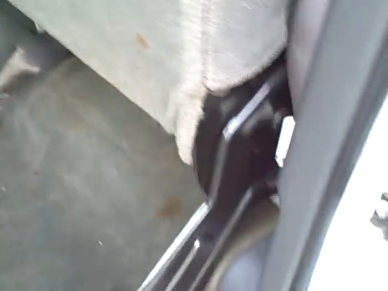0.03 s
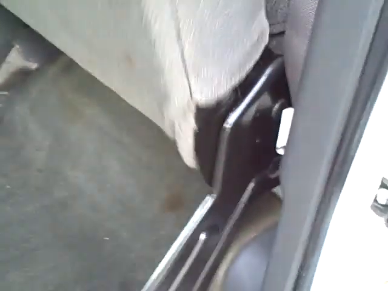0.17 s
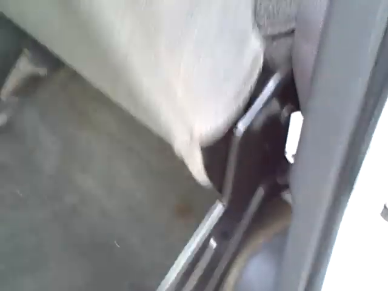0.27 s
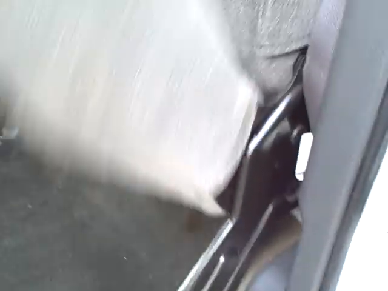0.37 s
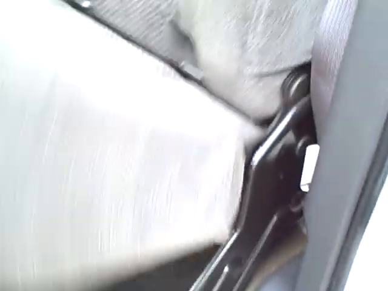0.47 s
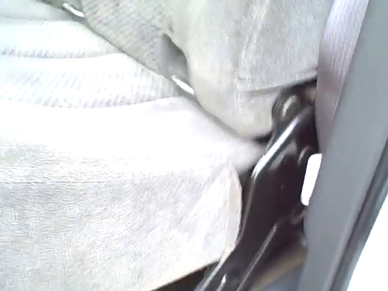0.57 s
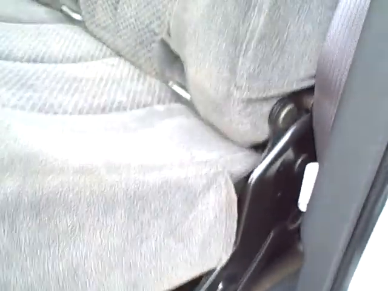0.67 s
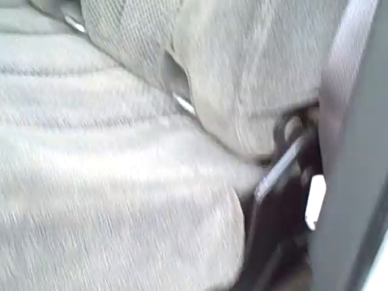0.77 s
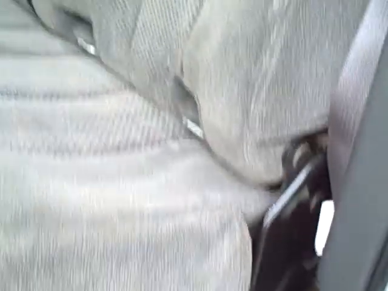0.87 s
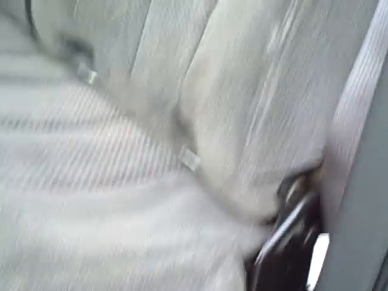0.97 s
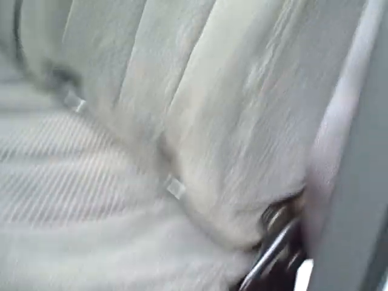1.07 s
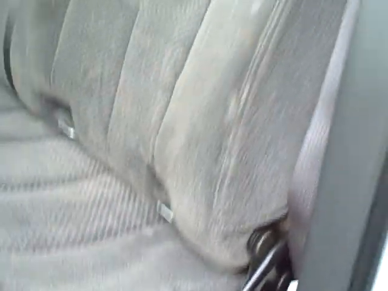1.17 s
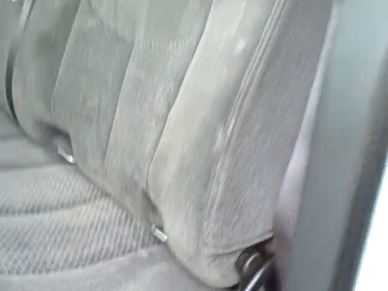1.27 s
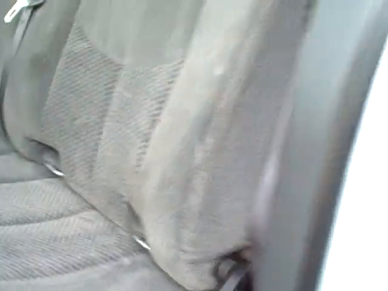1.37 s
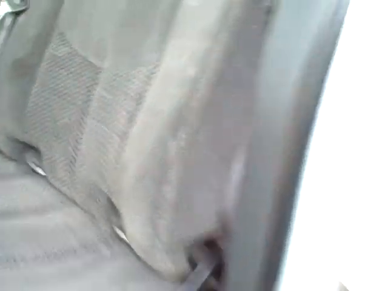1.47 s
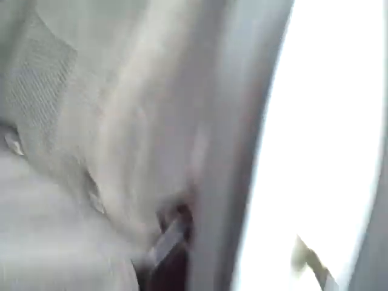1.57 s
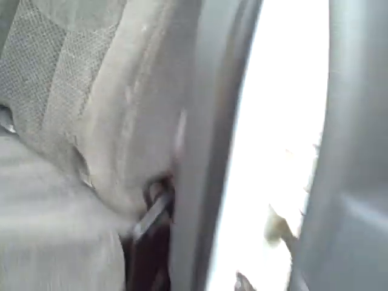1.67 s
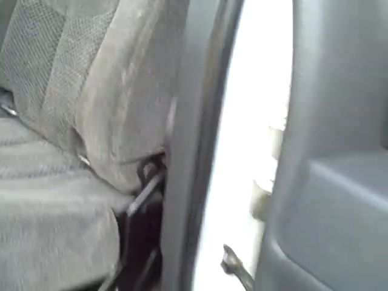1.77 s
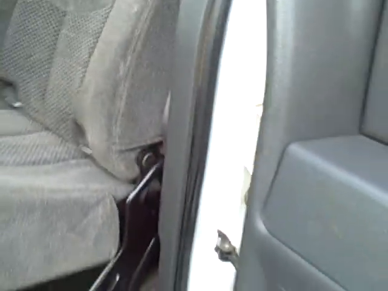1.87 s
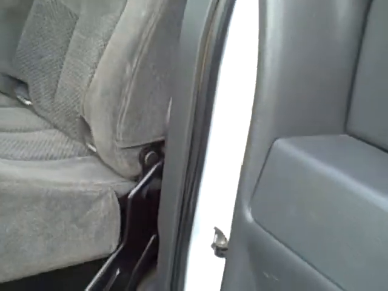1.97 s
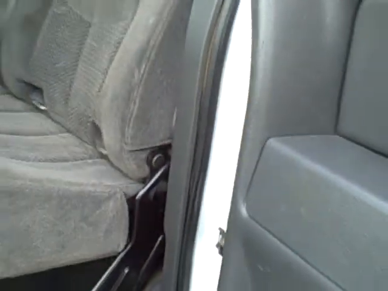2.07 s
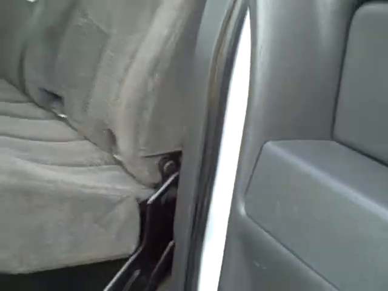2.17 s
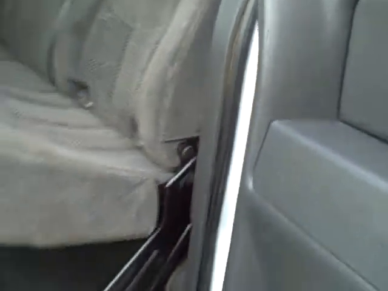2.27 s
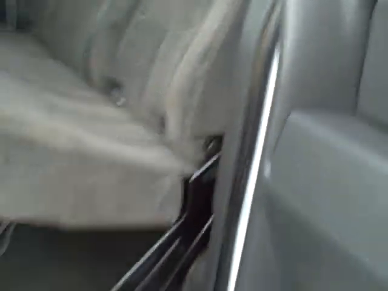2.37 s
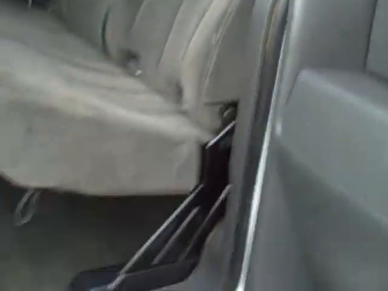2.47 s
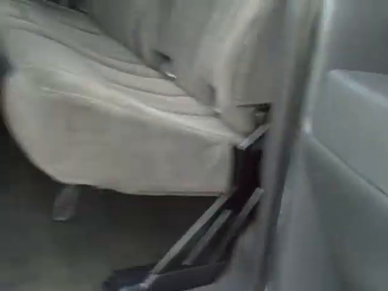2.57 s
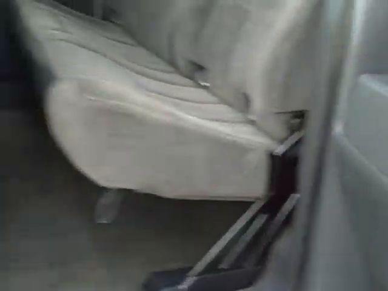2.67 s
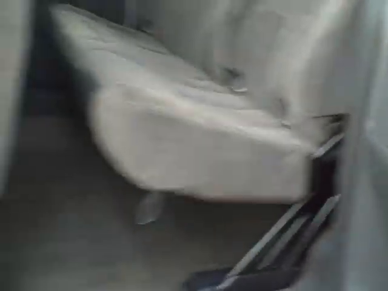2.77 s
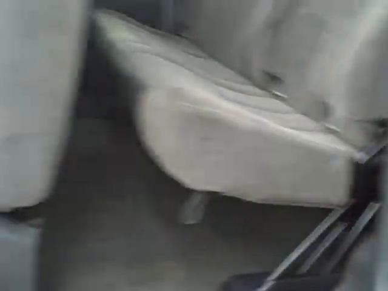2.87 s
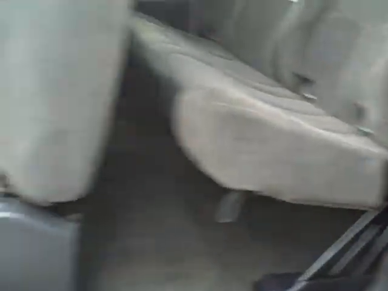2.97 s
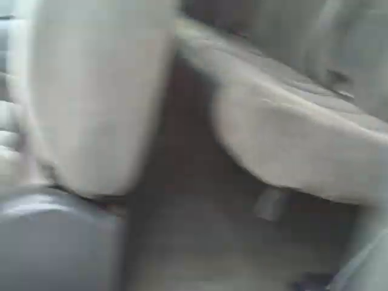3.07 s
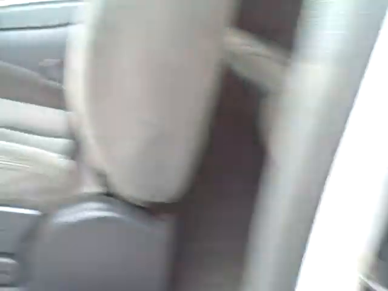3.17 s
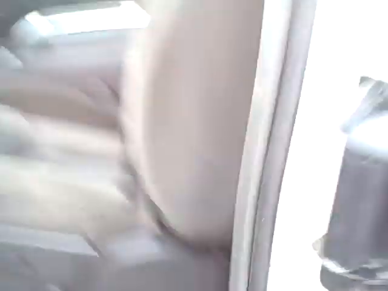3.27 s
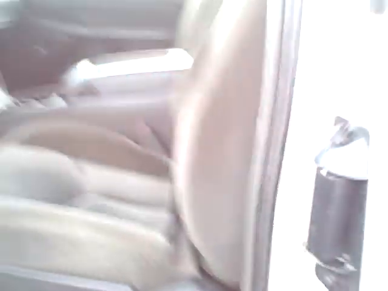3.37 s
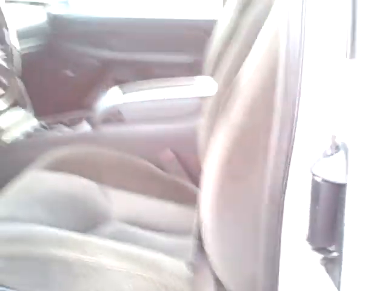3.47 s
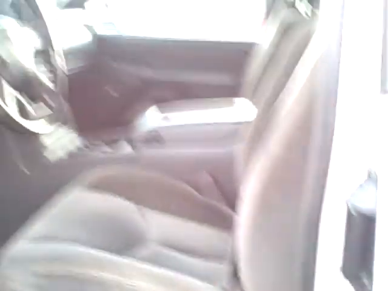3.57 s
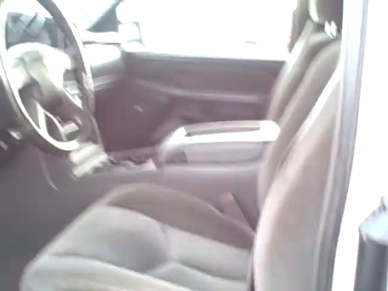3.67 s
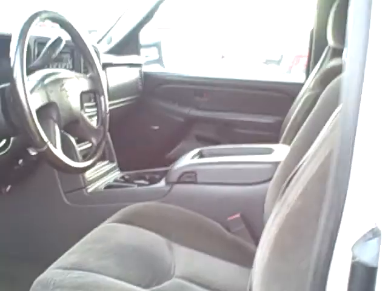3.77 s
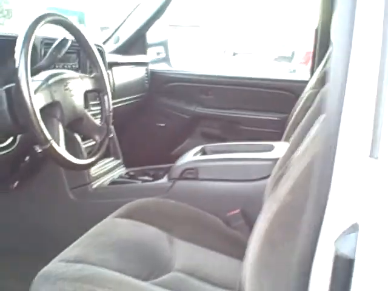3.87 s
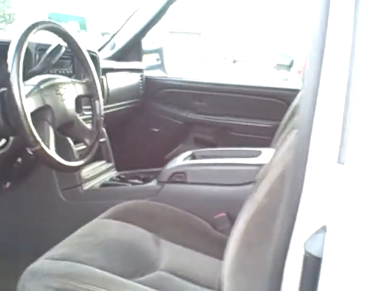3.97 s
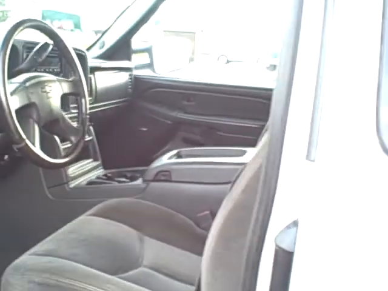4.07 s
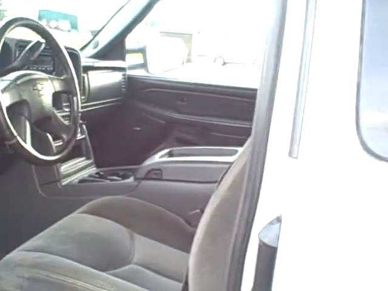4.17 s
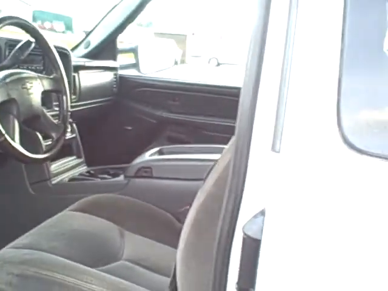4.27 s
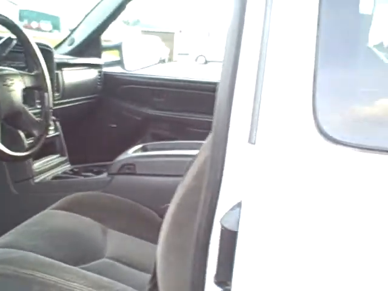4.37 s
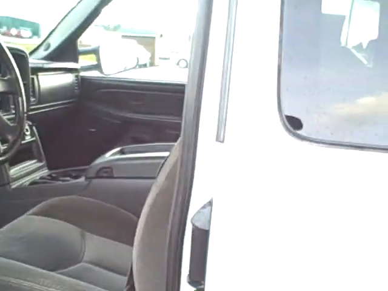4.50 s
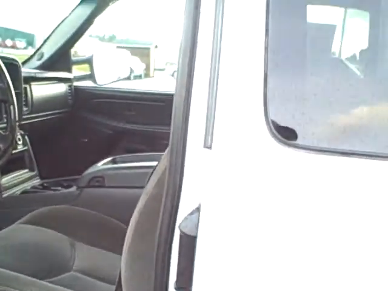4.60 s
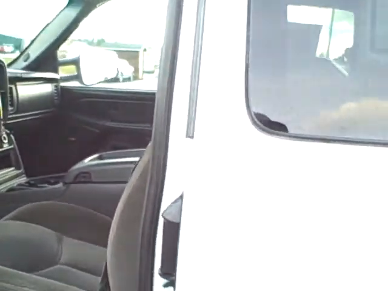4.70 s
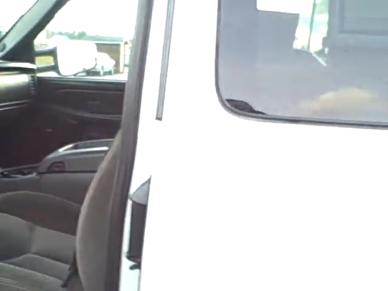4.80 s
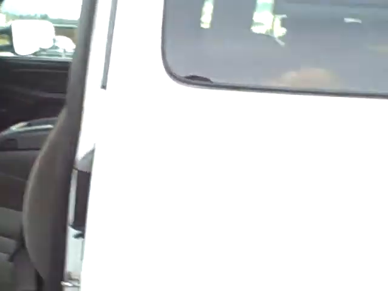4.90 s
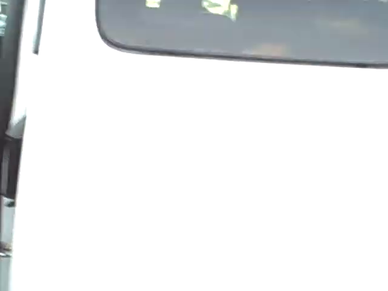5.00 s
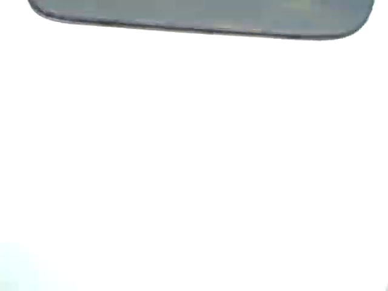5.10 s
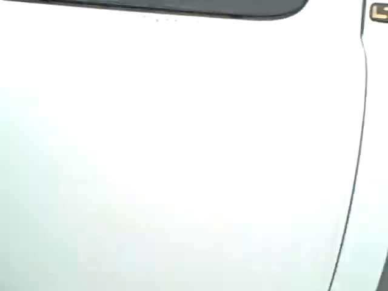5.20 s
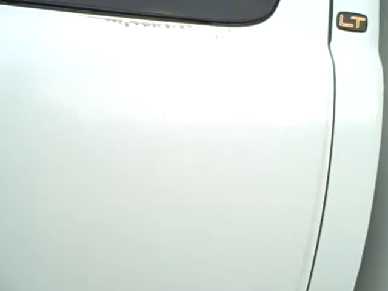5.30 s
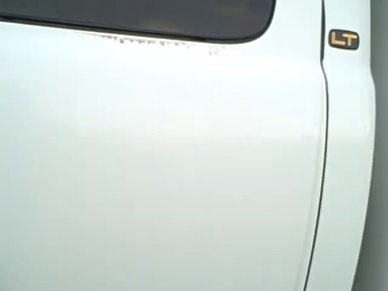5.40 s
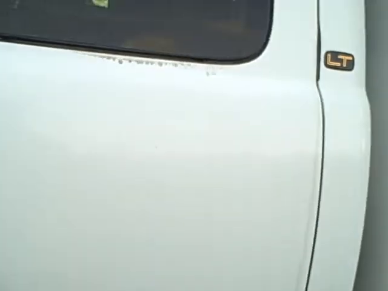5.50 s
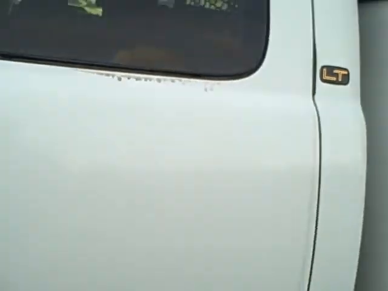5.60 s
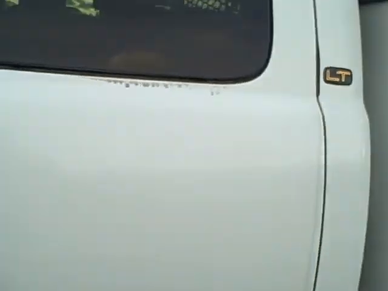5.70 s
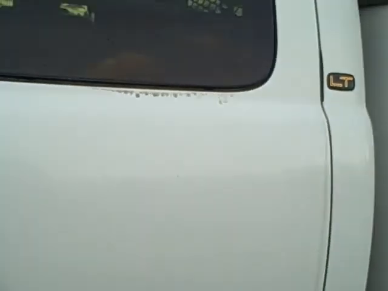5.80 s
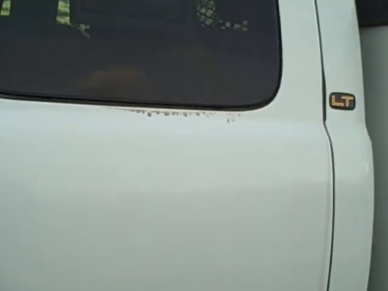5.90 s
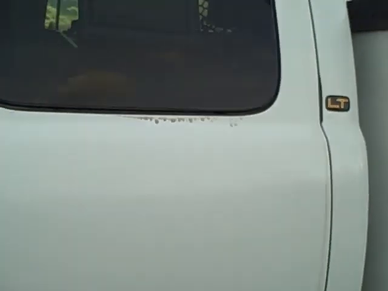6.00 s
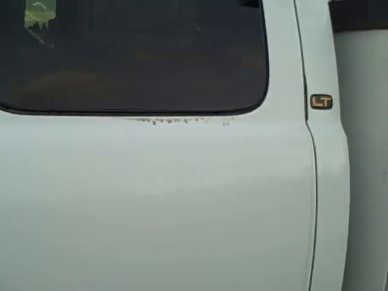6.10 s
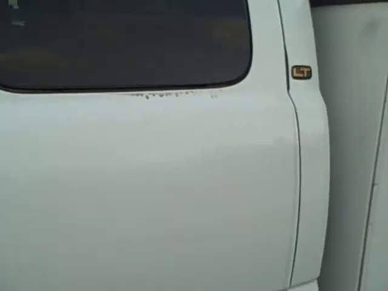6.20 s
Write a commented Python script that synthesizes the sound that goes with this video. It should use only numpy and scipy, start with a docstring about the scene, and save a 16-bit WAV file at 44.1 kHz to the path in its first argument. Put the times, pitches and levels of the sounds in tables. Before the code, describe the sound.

In a truck cab on an open lot, cloth rubs and a hinge creaks briefly before a rear bench drops with a bright metallic clack and low thump. Soft brushing and small trim knocks follow. The rear door slams with ringing metal and a deep boom; after light latch clicks, the front door slams shorter and drier. Distant traffic rumbles faintly. The close handheld microphone flattens the loudest peaks.

```python
"""Pickup bench and two door slams

Close by on an open lot, a rear bench drops onto its frame, then the rear half door and the front door slam.
Each is a run of metal contacts (shaped noise and ringing partials), then a thump of panel and cab air modes
that overloads the microphone. Between them cloth brushes (noise catches), the hinge creaks, trim and latches
click (resonant noise), thin tones whistle and the cab drones and rocks, over distant traffic (slow noise)."""
import sys
import numpy as np
from scipy import signal
from scipy.fft import rfft, irfft, next_fast_len
from scipy.io import wavfile
from scipy.ndimage import uniform_filter1d

SR = 44100
rng = np.random.default_rng(int(sys.argv[2]) if len(sys.argv) > 2 else 0)


def master(y):
    """Save y as 16-bit WAV."""
    cut = np.clip(np.atleast_2d(y).T, -1, 1)
    pcm = np.round(cut * 32767)  # scale
    wavfile.write(sys.argv[1], SR, pcm.astype(np.int16))


N = 275533
TIME = np.arange(N) / SR
AGE = TIME[:SR]  # the first second after a contact, thump or knock


def bench_drop():
    """The rear bench lands: metal contacts, then its mass arriving on the stops."""
    # metal contacts: start_s, level_db, tilt_db_per_octave, t60_s
    contacts = [(.5772, -2.5, -2, 0.029), (.599, -27.5, 7.5, 0.048), (.629, -37, 11.5, 0.057),
                (.651, -30.5, 8.5, .08), (.672, -33.5, 5.5, 0.071), (.7735, -25.5, 8, 0.04)]
    # colour of the contacts: freq_hz, relative_db
    metal = [(150, -14.5), (400, -7), (650, -7), (1050, -5.5), (1450, 1.5), (2200, -2.5), (3200, -1),
             (4000, -5), (4800, -9.5), (8000, -18.5), (15000, -22)]
    # clear partials of the steel, before each contact's lean: nominal_hz, relative_db, t60_s
    rings = [(1380, -14, .06), (1570, -14, .06), (1790, -15, .06), (2800, -14, .05), (3020, -14, .05),
             (4070, -16, .045)]
    # the mass arrives on its stops: start_s, level_db, push_s
    landings = [(.5845, -2.5, 0.00088), (.622, -8.5, .004), (.64, -17.5, 0.00014)]
    # panel and cab air modes, before the push dulls them: freq_hz, relative_db, t60_s
    modes = [(32.2, -6.5, 0.6), (68, -17, .36), (90.6, -12.5, 0.55), (128.2, -13, .25), (160.5, -6.5, 0.21),
             (192, -2, 0.13), (312, -4, 0.086), (368, -11, 0.076), (528, -24, 0.27), (630, -27.5, .13)]
    sound = clacks(contacts, metal, rings, gap_s=.0028, loss_db=-5.5, tail_db=-21, tail_t60=.22)
    return sound + thumps(landings, modes, shudder_db=-19, shudder_t60=.46)


def rear_door():
    """The rear half door slams: hinge, latch and striker contacts, then the panel meeting its seals."""
    # metal contacts: start_s, level_db, tilt_db_per_octave, t60_s
    contacts = [(3.521, -17, 0.5, 0.09), (3.5268, -3, 0, 0.11), (3.5465, -7.5, 0.5, 0.032),
                (3.5665, -7, -1, 0.081), (3.603, -23.5, -3.5, .1), (3.662, -42.5, 0.5, 0.093)]
    # colour of the contacts: freq_hz, relative_db
    metal = [(150, -16), (400, 1), (750, -1), (1200, -0.5), (1800, -7.5), (3000, -7.5), (5500, -14.5),
             (7400, -14), (8100, -7.5), (8900, -16), (12000, -12.5), (15500, -24)]
    # clear partials of the steel, before each contact's lean: nominal_hz, relative_db, t60_s
    rings = [(583, -17, .16), (744, -15, .14), (913, -18, .15), (1138, -14, .13), (1636, -18, .14),
             (1773, -21, .13), (1974, -23, .12), (3257, -25, .12), (3700, -51, .5), (6746, -26, .11),
             (7912, -20, .085), (8323, -20, .085)]
    # the mass arrives on its seals: start_s, level_db, push_s
    landings = [(3.535, -7.5, .001), (3.571, 0.5, 0.0014)]
    # panel and cab air modes, before the push dulls them: freq_hz, relative_db, t60_s
    modes = [(24, -11.5, 0.51), (38, -4.5, 0.14), (61.3, -13, 0.087), (97.6, -15, 0.37), (159.5, -15, .22),
             (173.3, -15, .4), (345.6, -7, 0.16), (439, -11.5, 0.12), (453, -20, 0.29), (635, -18, 0.17),
             (626, -9.5, 0.13), (700, -19, .15), (844, -24.5, .15), (1140, -26.5, .15)]
    sound = clacks(contacts, metal, rings, gap_s=.0025, loss_db=-4, tail_db=-20.5, tail_t60=.26)
    return sound + thumps(landings, modes, shudder_db=-15, shudder_t60=.39)


def front_door():
    """The front door slams: hinge, latch and striker contacts, then the panel meeting its seals."""
    # metal contacts: start_s, level_db, tilt_db_per_octave, t60_s
    contacts = [(5.5665, -25, -4.5, 0.078), (5.573, -8.5, 1.5, 0.069), (5.5885, -11.5, .5, 0.075),
                (5.622, -23, -1.5, .08), (5.6305, -17.5, -3, 0.1), (5.69, -29.5, 3, 0.065)]
    # colour of the contacts: freq_hz, relative_db
    metal = [(150, -4), (450, -1.5), (750, 7.5), (950, -6.5), (1150, 2), (1500, -2), (1950, 1.5),
             (2300, 0.5), (3000, 0), (4200, -5), (6200, -10), (9000, -9.5), (13000, -7), (16000, -8)]
    # clear partials of the steel, before each contact's lean: nominal_hz, relative_db, t60_s
    rings = [(1253, -7, 0.058), (2130, -29, 0.064), (2155, -6, 0.064), (2280, -2.5, 0.045),
             (2450, -3, 0.053), (3150, -39, 0.12)]
    # the mass arrives on its seals: start_s, level_db, push_s
    landings = [(5.576, -22, 0.00064), (5.5915, -5.5, 0.0012), (5.6237, -18.5, 0.00034),
                (5.63, -9, 0.00074)]
    # panel and cab air modes, before the push dulls them: freq_hz, relative_db, t60_s
    modes = [(30.2, -17, 0.503), (58, -29, 0.52), (82.8, -26, 0.78), (122, -0.5, 0.06), (153.5, -8, 0.13),
             (214, -12.5, 0.19), (363, -17, 0.34), (425, -12.5, 0.14), (513, 2, 0.055), (750, -28, 0.23),
             (810, -19, 0.24), (1157, -26, 0.32)]
    sound = clacks(contacts, metal, rings, gap_s=.0016, loss_db=-10, tail_db=-21.5, tail_t60=.28)
    return sound + thumps(landings, modes, shudder_db=-12, shudder_t60=.4)


def clacks(rows, metal, rings, gap_s, loss_db, tail_db, tail_t60, chatter_db=3, chatter_hz=900, detune=.003):
    """Each contact chatters on a crowd of short metal modes and rings a few clear ones; the cab adds a tail."""
    out = np.zeros(N)
    shared = rng.standard_normal(SR)  # the part of the noise that all contacts of one source have in common
    ring_hz, ring_db, ring_t60 = np.transpose(rings)
    for s, db, tilt_db, t60 in rows:
        strike, cab = rng.standard_normal((2, SR))
        chatter = (shared + strike) * undb(chatter_db * walk(chatter_hz, AGE))
        crack = colour(chatter, metal, tilt_db) * rebounds(t60, gap_s, loss_db)
        # hard contacts favour the high partials, soft ones the low
        lean_db = tilt_db * np.log2(ring_hz / 2500) - 3.8 * abs(tilt_db)
        detuned_hz = ring_hz * (1 + detune * rng.standard_normal(len(rings)))
        steel = partials(zip(detuned_hz, ring_db + lean_db, ring_t60))
        tail = colour(cab, metal, tilt_db - 2.0) * fade(tail_t60) * (1 - fade(0.033))
        add(out, s, undb(db) * (crack + steel + undb(tail_db) * tail))
    return out


def rebounds(t60, gap_s, loss_db, count=2):
    """Envelope of a contact that bounces: it comes again a few uneven milliseconds later, weaker every time."""
    power = fade(t60) ** 2
    total = power
    lates = np.cumsum(gap_s * (1 + .15 * rng.uniform(-1, 1, count)))
    for k, late in enumerate(lates):
        bounce = np.interp(AGE - late, AGE, power, left=0)
        total = total + undb(loss_db * (k + 1)) ** 2 * bounce
    return np.sqrt(total)


def thumps(rows, modes, shudder_db, shudder_t60, rattle_db=4.0):
    """A soft push swings the panel modes and sets the whole body shuddering unevenly; a longer push is duller."""
    # dense, dull shudder of the body: freq_hz, relative_db
    shudder_colour = [(25, -7), (70, -1), (160, -2), (260, -9.5), (400, -9), (800, -15.5), (1500, -22.5),
                      (4000, -39), (12000, -63.5)]
    out, panel = np.zeros(N), partials(modes)
    for s, db, push_s in rows:
        push = AGE * np.exp(-4 * AGE / push_s)
        uneven = rng.standard_normal(SR) * undb(rattle_db * walk(83, AGE))
        shudder = colour(uneven, shudder_colour) * fade(shudder_t60)
        body = undb(shudder_db) * shudder - panel
        add(out, s, undb(db) * signal.fftconvolve(body, push / push.sum())[:SR])
    return out


def partials(modes):
    """Sum of decaying sines from (Hz, dB, t60) rows; neighbouring modes swing in opposite directions."""
    out = np.zeros(SR)
    for k, (hz, db, t60) in enumerate(modes):
        out += (-1) ** k * undb(db) * np.sin(2 * np.pi * hz * AGE) * fade(t60)
    return out


def trim():
    """Trim and seat frame knock singly, with a few dull bumps."""
    # knocks, level before the snap: start_s, level_db, centre_hz, width_octaves
    trim_knocks = [(.044, -43, 930, 0.96), (.251, -50, 6000, 3.6), (.368, -59, 920, 0.47),
                   (.513, -38.5, 1070, 0.91), (1.378, -42, 374, 2.9), (1.41, -40.5, 700, 3.6),
                   (2.217, -46, 700, 0.42), (2.3626, -34, 1140, 1.12), (2.3635, -41.5, 4040, 0.14),
                   (2.513, -42.5, 665, 0.067), (2.729, -46.5, 276, 0.078), (3.902, -55, 3980, 3.4),
                   (3.927, -49.5, 2000, 0.89), (3.984, -57, 7000, 2.5), (4.228, -37.5, 80.3, 0.34),
                   (4.385, -36.5, 78.2, 0.31), (6.127, -42.5, 96.9, 0.29)]
    return knocks(trim_knocks, mount_db=-12, snap_db=-1, ring_s=.078)


def latches(loss_db=-2, scatter_db=4.0, uneven=.23, count=4):
    """Handle and latch parts rattle: runs of unevenly spaced little knocks that tend to grow weaker."""
    # runs of catches, level of the first before scatter and snap:
    # start_s, length_s, level_db, centre_hz, width_octaves
    runs = [(2.853, 0.02, -47, 2750, 1.6), (3.823, .036, -51, 3000, 1.3), (4.001, .06, -41, 2140, 1.46),
            (5.315, 0.017, -47, 1838, 0.35)]
    rows = []
    for s, length, db, hz, width in runs:
        for k, (early, size) in enumerate(rng.uniform(-1, 1, (count, 2))):
            late = length * (k + uneven * early * (k > 0)) / count
            rows.append((s + late, db + loss_db * k + scatter_db * size, hz, width))
    return knocks(rows, mount_db=-12, snap_db=0, ring_s=.1)


def knocks(rows, mount_db, snap_db, ring_s, mount_hz=400):
    """A part snaps and rings in one broad resonance; above mount_hz its panel's dull knock joins in."""
    ring_law = .42  # t60 is ring_s at 1 kHz and falls with pitch by this power
    out, at = np.zeros(N), octaves(SR)
    mount = undb(mount_db) / (1 + (at - np.log2(mount_hz)) ** 2)
    for s, db, hz, width in rows:
        t60 = ring_s * (hz / 1000) ** -ring_law
        resonance = (1 + ((at - np.log2(hz)) / width) ** 2) ** -1.5
        spectrum = resonance + mount * (hz > mount_hz)
        ring = unit(irfft(rfft(rng.standard_normal(SR)) * spectrum, SR))
        decay = fade(t60) + undb(snap_db) * fade(t60 / 10)
        onset = 1 - np.exp(-2 * hz * AGE)
        add(out, s, undb(db) * ring * decay * onset)
    return out


def cloth():
    """Overlapping strokes on the upholstery, over a slight steady rustle."""
    # strokes, timed at their firmest: peak_s, level_db, rise_s, fall_s
    stroke_rows = [(0.01, -57.5, .09, 0.06), (.27, -57.5, 0.16, .12), (.56, -46, 0.13, 0.23),
                   (1.031, -53.5, 0.12, .4), (1.439, -40, 0.083, .25), (1.8, -51.5, .16, 0.3),
                   (2.72, -68, 0.65, 0.4), (3.07, -52.5, 0.036, 0.02), (3.35, -41, 0.14, 0.096),
                   (3.475, -47.5, 0.055, .022), (5.25, -52, 0.088, 0.031), (5.761, -51.5, 0.3, 0.18)]
    # colour of the cloth at middling force: freq_hz, relative_db
    cloth_colour = [(150, -6.5), (400, -5.5), (1500, 1), (4500, -1), (8000, -0.5), (11000, 2), (13500, 4.5),
                    (16000, 1.5)]
    sleeve_db = -72.5  # clothes never keep quite still
    power = undb(sleeve_db) ** 2 + sum(swell(*stroke) ** 2 for stroke in stroke_rows)
    return rub(np.sqrt(power), cloth_colour, grain_db=1.5, slips_hz=28.8, slip_db=1.0, bite_db=2.5)


def creak(rate_hz=100, uneven=.1, hold=.3, size=80):
    """The hinge sticks and slips about a hundred times a second; each slip starts softly and rings briefly."""
    # the bench rubs on its hinges as it swings down: peak_s, level_db, rise_s, fall_s
    swing = (.47, -45.5, .062, .14)
    # colour of the hinge at middling force: freq_hz, relative_db
    hinge_colour = [(100, -15), (200, 3.5), (450, -1.5), (700, 2.5), (1000, -4), (1600, -14), (3000, -19.5),
                    (9000, -43.5)]
    phase = np.cumsum(rate_hz * (1 + uneven * walk(40))) / SR % 1
    slips = unit(uniform_filter1d(np.exp(-phase / hold), size))
    return slips * rub(swell(*swing), hinge_colour, grain_db=1.5, slips_hz=60, slip_db=0.0, bite_db=-0.3)


def rub(gain, spectrum, grain_db, slips_hz, slip_db, bite_db):
    """Friction: tiny unequal catches bunch up as surfaces stick and slip; force tilts them up by bite_db/octave."""
    catches = rng.standard_normal(N) * undb(grain_db * walk(740) + slip_db * walk(slips_hz))
    force = np.sqrt(gain / gain.max())
    light = colour(catches, spectrum, -bite_db)
    firm = colour(catches, spectrum, bite_db)
    return gain * ((1 - force) * light + force * firm)


def swell(s, db, rise_s, fall_s):
    """Gain of one movement: it builds up to its firmest moment and eases off."""
    shape = 1.3  # 1 = pointed swell, 2 = round bell
    away = np.maximum((s - TIME) / rise_s, (TIME - s) / fall_s)
    return undb(db) * np.exp(-np.clip(away, 0, 10) ** shape)


def whistles(waver_hz=100):
    """Faint, thin, unsteady tones glide and swell once while the doors swing."""
    # glides, level at the top of the swell before flutter: start_s, end_s, start_hz, end_hz, level_db
    glides = [(1.75, 2.28, 1900, 1400, -61), (4.82, 4.93, 4350, 4500, -69), (4.96, 5.2, 4700, 4500, -74)]
    out = np.zeros(N)
    for start, end, start_hz, end_hz, db in glides:
        progress = np.clip((TIME - start) / (end - start), 0, 1)
        hz = start_hz + (end_hz - start_hz) * progress + waver_hz * walk(400)
        tone = np.sin(2 * np.pi * np.cumsum(hz) / SR)
        out += undb(db) * np.sin(np.pi * progress) * walk(300) * tone
    return out


def rocking(hz=30, wander=.09):
    """The sprung bench sways and pumps a very low, unsteady tone into the cab."""
    phase = 2 * np.pi * np.cumsum(hz * (1 + wander * walk(11))) / SR
    sway = swell(s=1.05, db=-44.5, rise_s=.1, fall_s=.52)
    return np.sqrt(2) * np.sin(phase) * undb(1.5 * walk(8)) * sway


def drone(hz=166, flutter_hz=45):
    """Outside noise keeps one air resonance of the cab humming until the microphone is drawn out of it."""
    cab_db, leave_s, fade_s = -59.5, 2.2, .5
    phase = 2 * np.pi * hz * TIME
    inside = undb(cab_db) / (1 + np.exp((TIME - leave_s) / fade_s))
    return unit(walk(flutter_hz) * np.sin(phase) + walk(flutter_hz) * np.cos(phase)) * inside


def lot(swell_db=1.6):
    """Distant traffic: two unrelated layers that swell slowly."""
    # colour of the traffic: freq_hz, relative_db
    traffic_colour = [(20, -3), (60, -1), (120, -2.5), (200, -12), (300, -16), (520, -17), (820, -20),
                      (1300, -25), (2000, -31), (3000, -38.5), (5000, -41), (16000, -47)]
    # traffic, shaded while the microphone is inside the cab: time_s, level_db
    traffic_level = [(0, -52.5), (1.1, -55.5), (1.6, -53), (3.3, -51), (4.7, -51), (6.25, -50.5)]
    layers = [colour(rng.standard_normal(N), traffic_colour) * undb(swell_db * walk(rate)) for rate in (1.5, 7)]
    return unit(sum(layers)) * fader(traffic_level)


def undb(db):
    """Decibels to gain."""
    return 10 ** (np.asarray(db) / 20)


def unit(x):
    """Scale to rms 1."""
    return x / np.sqrt(np.mean(x ** 2))


def fader(rows):
    """Gain over time from (s, dB) rows."""
    return undb(np.interp(TIME, *np.transpose(rows)))


def octaves(size):
    """Octaves above 1 Hz of each bin of a spectrum."""
    return np.log2(np.maximum(np.fft.rfftfreq(size, 1 / SR), 1))


def colour(x, points, tilt_db=0):
    """Shape x by (Hz, dB) points, tilted per octave and falling off below the first point; rms becomes 1."""
    hz, db = np.transpose(points)
    size = next_fast_len(len(x), real=True)
    at, knots = octaves(size), np.log2(hz)
    low_cut_db = 12 * np.maximum(knots[0] - at, 0)
    shape_db = np.interp(at, knots, db) + tilt_db * at - low_cut_db
    return unit(irfft(rfft(x, size) * undb(shape_db), size)[:len(x)])


def fade(t60):
    """One second of exponential decay, down 60 dB after t60 seconds."""
    return np.exp(-np.log(1000) * AGE / t60)


def add(track, s, sound):
    """Mix a sound into the track at a time."""
    start = int(s * SR)
    track[start:start + len(sound)] += sound[:N - start]


def walk(rate, time=TIME):
    """Random values, rate of them a second, joined by straight lines, with a spread near 1."""
    steps = rng.standard_normal(8192)
    return np.interp(time * rate, np.arange(len(steps)), steps)


def scene():
    """Bench, rear door and front door, with the handling between them and the traffic behind."""
    slams = bench_drop() + rear_door() + front_door()
    handling = trim() + latches() + cloth() + creak()
    air = whistles() + rocking() + drone()
    return (slams + handling + air + lot())[None]


def record(dry, ceiling=0.66):
    """The microphone drops the deepest swing and flattens the loudest peaks; the top is cut."""
    top_hz = 15900
    dry = signal.sosfilt(signal.butter(1, 10, "high", fs=SR, output="sos"), dry)
    clipped = dry / (1 + (dry / ceiling) ** 8) ** (1 / 8)
    return signal.fftconvolve(clipped, signal.firwin(301, top_hz, fs=SR)[None], "same")


dry = scene()
out = record(dry)
master(out)
```